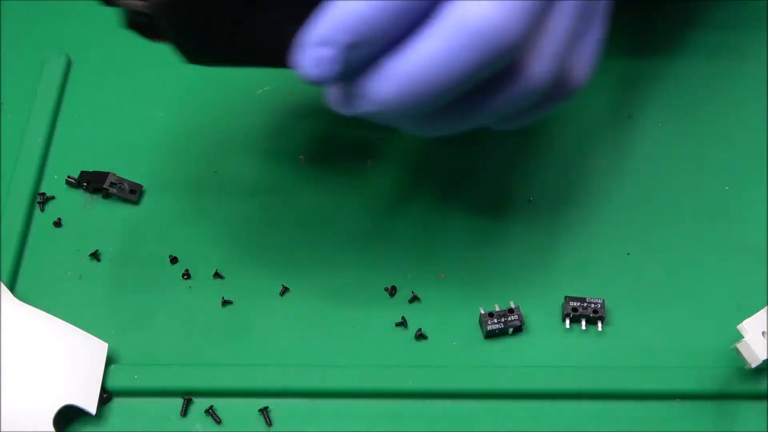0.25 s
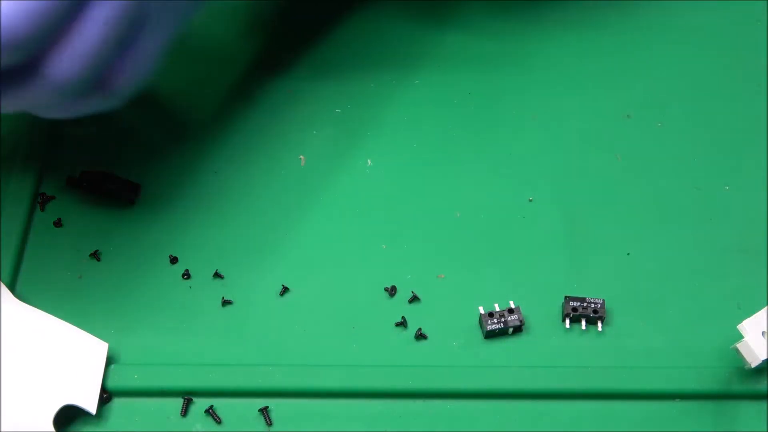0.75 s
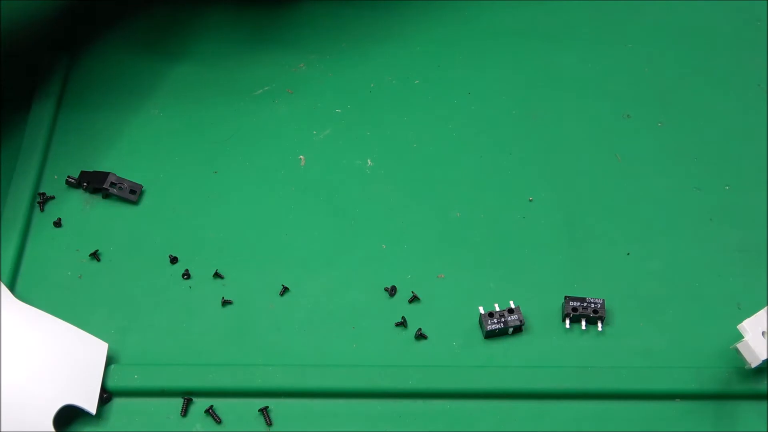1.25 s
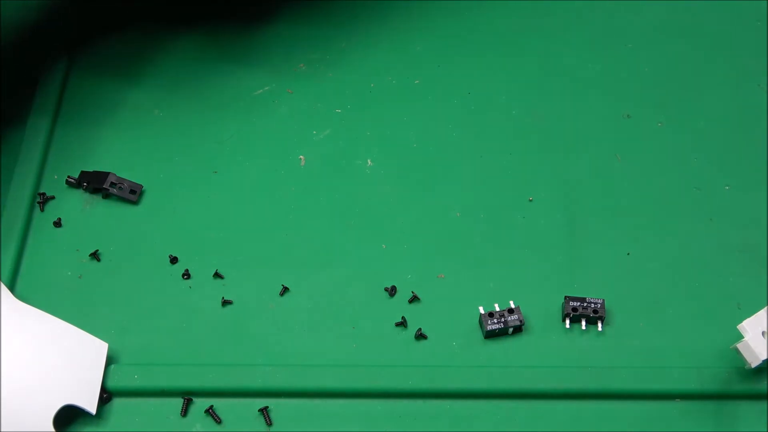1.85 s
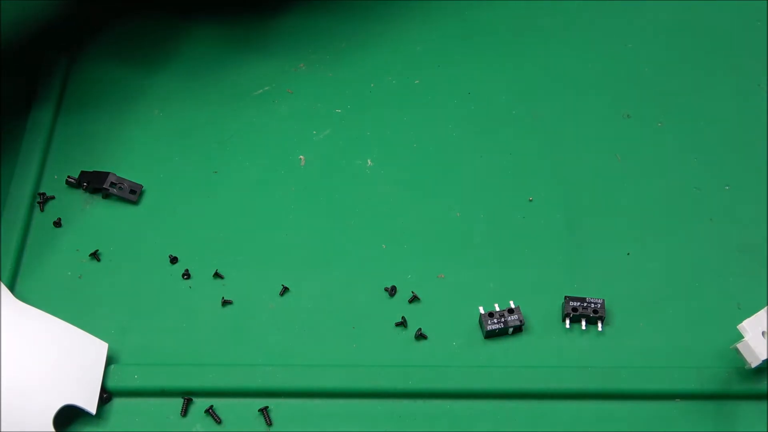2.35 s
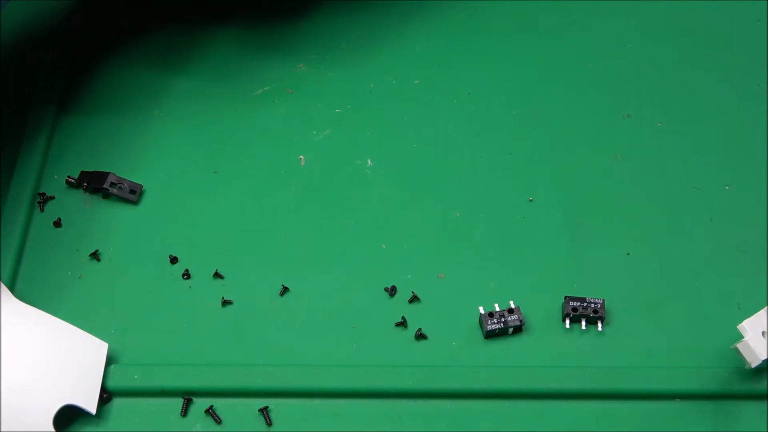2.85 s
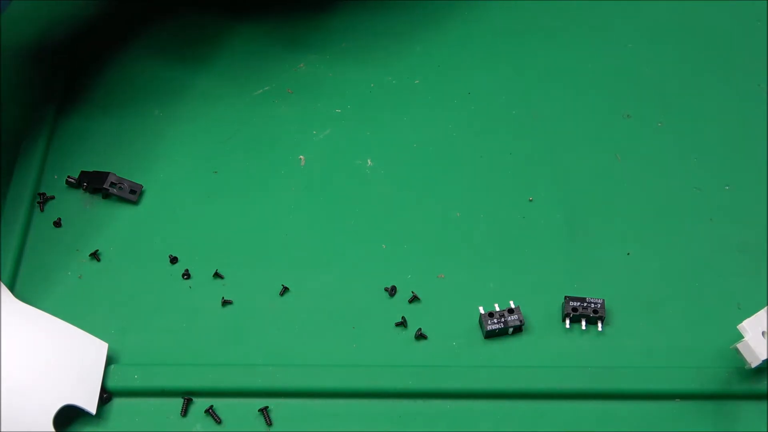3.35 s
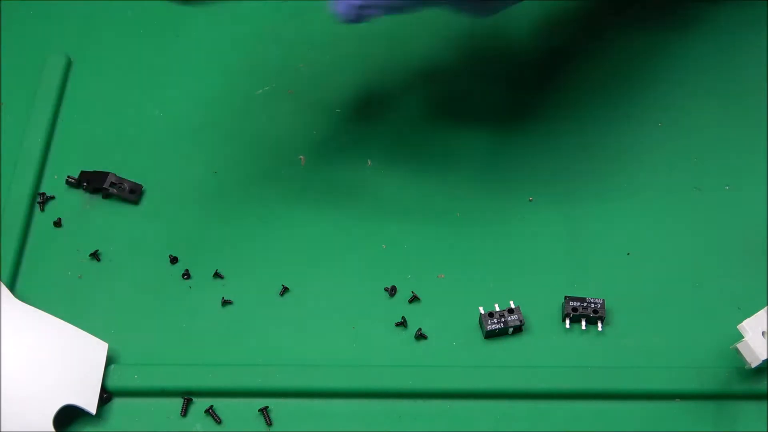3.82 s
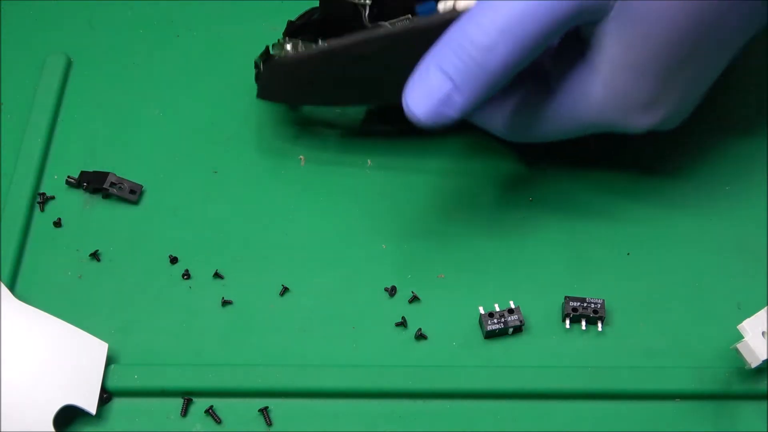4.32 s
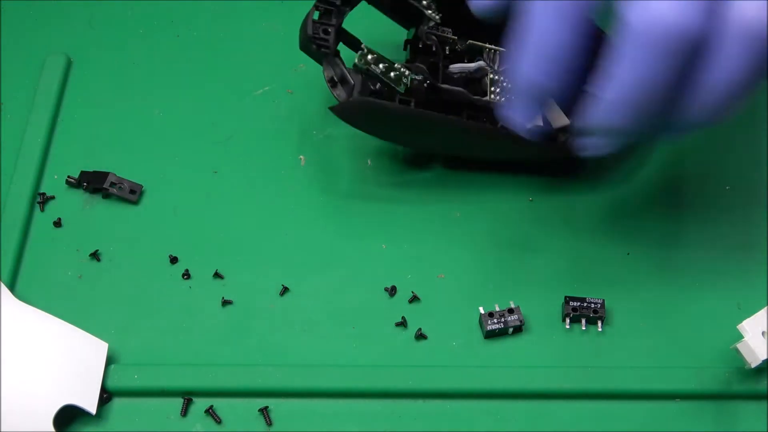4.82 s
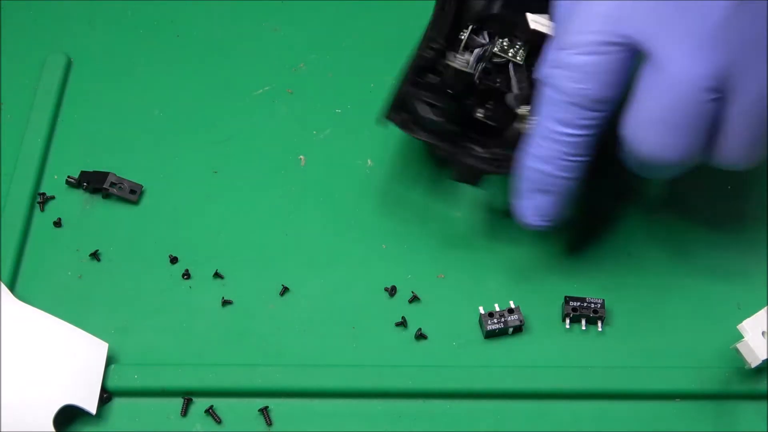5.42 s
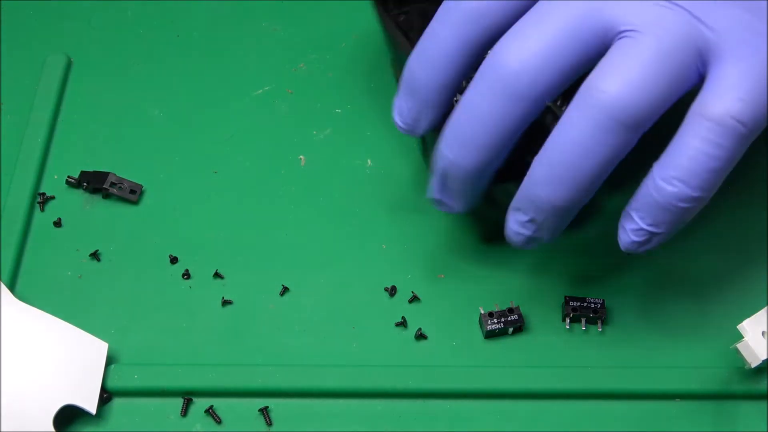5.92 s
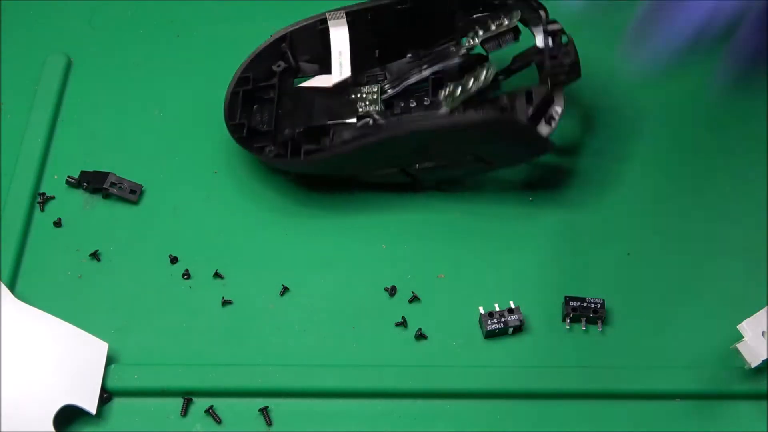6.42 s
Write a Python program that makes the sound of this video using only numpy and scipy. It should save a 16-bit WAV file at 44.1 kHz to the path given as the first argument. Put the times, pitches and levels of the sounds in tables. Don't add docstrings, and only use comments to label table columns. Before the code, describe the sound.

Plastic knocks and clicks over a rumbling fan, then a long harsh hiss of compressed air, a quiet gap, and more handling clatter.

```python
import sys
import numpy as np
from scipy import signal
from scipy.fft import rfft, irfft, next_fast_len
from scipy.io import wavfile
from scipy.ndimage import uniform_filter1d, map_coordinates

SR = 44100
rng = np.random.default_rng(int(sys.argv[2]) if len(sys.argv) > 2 else 0)


def dump_mix(stems):
    frames = np.atleast_2d(stems).T
    limited = np.clip(frames, -1, 1)
    pcm = np.round(limited * 32767).astype(np.int16)
    wavfile.write(sys.argv[1], SR, pcm)


def decibels_to_gain(level_db):
    exponent = np.asarray(level_db, float) / 20
    return 10 ** exponent


N = 294147


def unit(x):
    return x / np.sqrt(np.mean(x ** 2) + 1e-20)


def along(points, hz):
    f, v = np.transpose(points)
    return np.interp(np.log(hz + 1), np.log(f + 1), v)


def curves(rows):
    s, *cols = np.transpose(rows)
    return [np.interp(np.arange(N) / SR, s, c) for c in cols]


def wobble(rate):
    coarse = np.arange(0, N + 8, 8)
    knots = rng.standard_normal(int(N * rate / SR) + 4)
    return np.interp(np.arange(N), coarse, map_coordinates(knots, [coarse * rate / SR]))


def filtered(x, response):
    m = next_fast_len(N + 8192)
    return irfft(rfft(x, m) * response(np.fft.rfftfreq(m, 1 / SR)), m)[..., :N]


def hump(hz, centre_hz, width_hz):
    return 1 / (1 + (2 * (hz - centre_hz) / width_hz) ** 2)


def lifted(peaks, hz):
    return decibels_to_gain(sum(db * hump(hz, c, w) for c, w, db in peaks))


def rush(colour, peaks, alike, side, patchy_db, lead=((1, 0),), moving_db=0):
    z = signal.stft(rng.standard_normal((2, N)), nperseg=512)[2]
    field = uniform_filter1d(rng.standard_normal(z.shape[1:]), size=4, axis=0)
    field = uniform_filter1d(field, size=9, axis=1)
    pair = signal.istft(z * decibels_to_gain(patchy_db * unit(field) + moving_db), nperseg=512)[1]
    m = next_fast_len(N + 8192)
    hz = np.fft.rfftfreq(m, 1 / SR)
    turn = np.arccos(np.clip(along(alike, hz), 0, 1)) / 2
    coloured = rfft(pair, m) * decibels_to_gain(along(colour, hz)) * lifted(peaks, hz)
    shared, own = coloured * [np.cos(turn), np.sin(turn)]
    half = decibels_to_gain(along(side, hz) / 2) * np.exp(.5j * along(lead, hz))
    out = irfft([(shared + own) * half, (shared - own) / half], m)[:, :N]
    return out / np.std(out.mean(axis=0))


def narrow(hz, width_hz):
    slow = filtered(rng.standard_normal((2, N)), lambda f: hump(f, 0, width_hz))
    turn = 2 * np.pi * np.cumsum(hz * np.ones(N)) / SR
    return unit(slow[0] * np.cos(turn) + slow[1] * np.sin(turn))


def add(out, s, mono, pan_db):
    start = round(s * SR)
    out[:, start:start + len(mono)] += mono * decibels_to_gain([[pan_db / 2], [-pan_db / 2]])


# Hz, t60 in seconds.
WALLS = [(300, 0.43), (2000, 0.12), (8000, 0.2), (15000, 0.11)]


def walls(x):
    hz, t, z = signal.stft(rng.standard_normal((2, SR // 2)), SR, nperseg=256)
    tail = signal.istft(z * decibels_to_gain(-60 * t / along(WALLS, hz)[:, None]), SR, nperseg=256)[1]
    delayed = np.pad(x.mean(axis=0), (300, 0))[None]
    return signal.fftconvolve(delayed, tail / np.linalg.norm(tail[0]), axes=1)[:, :N]


# opens in seconds, rise in seconds, shuts in seconds, fall in seconds.
VALVE = (1.166, 0.01, 3.551, 0.0019)


def camera_gain():
    duck_db, duck_s = 13, 0.037
    quick_db, quick_s, creep_db_per_s = 6, 0.021, 3
    opens, _, shuts, _ = VALVE
    t = np.arange(N) / SR
    after = np.clip(t - shuts, 0, None)
    back_db = quick_db * (1 - np.exp(-after / quick_s)) + creep_db_per_s * after
    return -np.clip(duck_db * np.clip((t - opens) / duck_s, 0, 1) - back_db, 0, None)


# Hz, dB per Hz.
ROOM_AIR = [(15, -55), (25, -23), (120, -8), (260, -8), (520, -22), (950, -34.5), (2000, -46), (16000, -61)]
# Hz, width in Hz, dB.
DUCT = [(57, 8.2, 13), (82, 12, 6), (117.8, 11, 6), (182.6, 37, 5.5), (250, 43, 8), (350, 46, -2),
        (426, 47, 6), (7300, 6100, 4)]
# Hz, left over right in dB.
FAN_SIDE = [(60, -0.5), (110, -7), (200, 3.5), (380, 11), (800, 12.5), (3500, 6.5), (8120, -3), (15000, 0)]
# Hz, likeness 0..1.
FAN_ALIKE = [(60, 0.89), (130, 1), (290, 0.94), (640, 0.81), (1410, 0.93), (3100, .99), (6820, 0.34),
             (15000, 0.45)]
# Hz, rms level in dB.
WHINE = [
    (7101, -80.5),
]
# Hz, dB per Hz.
CAPSULE = [(500, -19.5), (2000, 8), (8000, -11), (15500, -15)]


def fan():
    fan_db = -27
    air = rush(ROOM_AIR, DUCT, FAN_ALIKE, FAN_SIDE, patchy_db=.4)
    whine_hz, whine_db = WHINE[0]
    whine_level = decibels_to_gain(whine_db + 8 - fan_db + 3.5 * wobble(2))
    whine = whine_level * np.sin(2 * np.pi * whine_hz * np.arange(N) / SR + .6 * wobble(30))
    capsule = rush(CAPSULE, [], [(1000, .6)], [(1000, 0)], patchy_db=1.5)
    return decibels_to_gain(fan_db + camera_gain()) * (air + whine) + decibels_to_gain(-67.5) * capsule


# seconds, level in dB.
RUB = [
    [(0.0, -67), (0.396, -54), (0.552, -52), (0.612, -44), (0.68, -38), (0.76, -52.5), (0.988, -55),
     (1.16, -50.5)],
    [(3.62, -48), (3.7, -58), (4.21, -65), (4.36, -58), (5.6, -61), (5.91, -49.5), (6.05, -57.5),
     (6.3, -58.5), (6.67, -48.5)],
]
# Hz, dB per Hz.
RUB_COLOUR = [(500, -43.5), (1000, -1.5), (2200, 1.5), (5000, -4.5), (9000, -11), (15500, -23)]
# start in seconds, length in seconds, level in dB.
SCUFFS = [(0, 0.094, -57.5), (0.136, .03, -51), (0.459, 0.072, -44.5), (0.636, 0.037, -43),
          (0.653, 0.056, -40.5), (0.925, .04, -59), (4.215, .022, -33), (4.226, 0.11, -44.5),
          (4.338, 0.032, -43), (4.676, 0.056, -50), (5.81, 0.038, -65), (5.937, .04, -55),
          (4.78, 0.092, -59), (6.243, .05, -62)]
# start in seconds, length in seconds,
# start Hz, end Hz, level in dB.
SQUEAKS = [(.325, 0.033, 4400, 4520, -61), (0.353, 0.045, 4600, 4700, -54.5),
           (3.556, 0.007, 1680, 1450, -16.5), (0.6, 0.029, 3600, 3630, -50), (3.91, 0.022, 6930, 7000, -61),
           (4.664, 0.019, 2250, 2250, -42), (4.679, 0.023, 2210, 2120, -45), (5.73, 0.041, 5400, 5430, -56),
           (5.814, 0.038, 1130, 1020, -40), (5.847, 0.018, 1110, 1100, -43),
           (5.865, 0.032, 1062, 1120, -45), (5.9, 0.02, 1190, 1186, -40), (5.873, .012, 1200, 1190, -44),
           (5.887, 0.03, 2210, 1804, -38), (5.902, 0.022, 1920, 2230, -45),
           (5.918, 0.059, 1150, 1070, -45.5), (5.945, 0.047, 2170, 2350, -53.5),
           (5.897, 0.037, 8700, 8900, -52), (5.956, 0.046, 8700, 8700, -45.5),
           (6.03, 0.048, 8750, 8800, -60), (6.05, .02, 7350, 7350, -57), (6.562, 0.041, 5840, 5800, -57),
           (1.123, 0.048, 1050, 1050, -49)]
# start in seconds, length in seconds, level in dB, centre in Hz.
RUSTLES = [
    (0, .04, -53, 10400),
    (3.741, .04, -58, 7300),
    (4.145, .02, -66, 8000),
    (4.967, .05, -57, 7000),
    (5.558, .03, -60, 8000),
]
# Hz, likeness 0..1.
NEAR_ALIKE = [(60, 0.63), (130, 0.61), (290, 0.26), (640, 0.88), (1410, 0.78), (3100, 1), (6820, 0.82),
              (15000, 0.61)]


def gloves():
    level_db, = curves(RUB[0] + [(1.17, -103), (3.55, -101)] + RUB[1])
    now = np.arange(N) / SR
    scuffs = sum(decibels_to_gain(db) * np.sin(np.pi * np.clip((now - s) / length, 0, 1) ** 0.57)
                 for s, length, db in SCUFFS)
    clumps = unit(decibels_to_gain(1.8 * wobble(60) + 2.5 * wobble(400)))
    grain = rush(RUB_COLOUR, [(1100, 470, 6.7)], NEAR_ALIKE, [(1000, 2), (8000, 2.5)], patchy_db=1.5)
    rub = (decibels_to_gain(level_db) + scuffs) * clumps * grain
    out = np.zeros((2, N))
    for s, length, hz, end_hz, db in SQUEAKS:
        t = np.arange(round(length * SR)) / SR
        rough = 0.11 * (2000 / hz) ** 0.25
        glide = 2 * np.pi * np.linspace(hz, end_hz, len(t)) / SR
        phase = np.cumsum(glide + rough * rng.standard_normal(len(t)))
        stutter_db = 3 * np.interp(t, np.arange(20) * .006, rng.standard_normal(20))
        swell = np.sqrt(np.sin(np.pi * t / length))
        add(out, s, decibels_to_gain(db + stutter_db) * swell * np.sin(phase), pan_db=12.0)
    for s, length, db, hz in RUSTLES:
        t = np.arange(round(length * SR)) / SR
        band = signal.butter(2, [hz / 1.3, hz * 1.3], "bandpass", fs=SR)
        dry_noise = signal.lfilter(*band, rng.standard_normal(len(t)))
        add(out, s, decibels_to_gain(db) * np.sin(np.pi * t / length) * unit(dry_noise), pan_db=5)
    return rub + out


# start in seconds, peak in dB, Hz, t60 in seconds.
BUMPS = [(0.445, -14.5, 387, 0.093), (0.656, -10, 287, 0.097), (0.78, -10.5, 277, 0.1),
         (0.875, -10.5, 265, 0.045), (1.015, -8.5, 250, 0.041), (4.369, -15.5, 197, 0.065),
         (4.696, -17, 168, 0.2), (5.737, -21, 236, 0.099), (5.832, -15, 248, 0.068),
         (5.986, -15.5, 250, 0.11), (6.157, -17, 187, 0.076), (6.627, -13, 260, 0.034)]


def bumps():
    out, t = np.zeros((2, N + SR)), np.arange(SR // 4) / SR
    for s, db, hz, t60 in BUMPS:
        ring = np.sin(2 * np.pi * hz * t) + 0.36 * np.sin(2 * np.pi * 1.7 * hz * t)
        level = decibels_to_gain(db - 2.0 - 60 * t / max(t60, .02))
        add(out, s, level * (1 - np.exp(-t / 0.0037)) * ring, pan_db=8.0)
    return out[:, :N]


# start in seconds, peak in dB, ring in Hz, left over right in dB.
TICKS = [(0.1353, -24, 8900, 4), (0.2389, -48, 7100, 1), (0.893, -35, 7700, -3), (0.9173, -32.5, 6500, 12),
         (3.7294, -43, 7390, -1.1), (3.9071, -20.5, 10700, 2), (3.9777, -31, 7500, 3.5),
         (4.3627, -15, 11300, 3), (4.413, -20, 5870, 4.5), (4.7666, -29, 6500, 3.5),
         (4.791, -34, 4810, -1.5), (5.011, -33, 5600, -3.5), (5.0385, -38, 7300, 0), (.1545, -42, 6600, 2),
         (4.87, -45, 10000, -2), (6.092, -44, 9500, -2), (5.0453, -36, 5544, .1), (5.472, -27, 7960, -4),
         (5.5548, -36.5, 7440, -4), (5.961, -21.5, 6300, 12), (6.078, -26, 5850, -5),
         (6.135, -37, 4090, -1), (6.222, -22, 5470, 5), (6.2452, -42.5, 4200, -3), (6.3394, -36, 5770, 1),
         (6.442, -21, 6000, 3), (6.641, -26, 12500, 4), (6.663, -36, 12000, 3), (6.466, -30, 6000, 9),
         (6.37, -37.5, 8000, .1), (6.54, -36, 9100, 2), (.049, -34, 7500, 2), (3.825, -44, 11000, 1),
         (3.895, -39, 8500, 1), (4.005, -50, 12000, -1), (5.226, -45, 10000, .1), (5.316, -45, 12000, .1),
         (5.342, -40.5, 6440, .1), (5.57, -41, 8000, .1), (6.527, -40, 5000, -1), (6.578, -40.5, 12500, .1),
         (6.626, -44, 12000, .1), (4.69, -34.5, 9500, 3), (4.697, -38, 6600, 3), (4.774, -39, 9000, 3)]


def ticks():
    t60_s, ring_db, tail_db, tail_t60_s = 0.01, -9, -21, .06
    out, t = np.zeros((2, N + SR)), np.arange(SR // 8) / SR
    dying = decibels_to_gain(-60 * (t / t60_s) ** 1.25) + decibels_to_gain(tail_db - 60 * t / tail_t60_s)
    attack = 1 - np.exp(-t / 0.00027)
    for s, db, hz, pan_db in TICKS:
        thin = signal.butter(2, [hz / 1.9, min(hz * 1.7, 15500)], "bandpass", fs=SR)
        crack = signal.lfilter(*thin, rng.standard_normal(len(t)))
        ring = decibels_to_gain(ring_db) * np.sin(2 * np.pi * hz * t)
        add(out, s, decibels_to_gain(db - 6.5) * dying * attack * (crack + ring), pan_db)
    return out[:, :N]


# start in seconds, peak in dB, Hz, t60 in seconds.
RINGS = [(.6225, -28, 7020, .03), (0.62, -30, 4900, .012), (.6228, -38, 9500, .012),
         (.6492, -16, 2400, 0.012), (0.649, -28, 8300, .008), (0.65, -18.5, 5700, .025),
         (0.65, -30, 8960, 0.031), (0.65, -35, 1150, 0.016), (0.65, -20, 3200, 0.011),
         (.666, -15.5, 1920, 0.018), (.688, -31, 7500, .015), (3.9072, -29, 8570, 0.0086),
         (3.9072, -24, 10500, .012), (3.9078, -24, 7100, 0.0087), (3.56, -29.5, 1480, 0.16),
         (0.81, -23, 930, 0.032), (4.26, -36, 1900, .02), (4.2036, -35, 7400, .01),
         (4.2023, -24.5, 2600, 0.013), (4.2246, -19, 1890, 0.02), (4.2317, -13.5, 1800, 0.015),
         (4.231, -23.5, 3320, .015), (4.3335, -28, 2400, .02), (4.3355, -19.5, 950, 0.021),
         (4.363, -27.5, 6750, .018), (4.3632, -30, 10300, .014), (4.3635, -36, 8400, 0.01),
         (5.8098, -34, 6000, .03), (5.8098, -32, 3400, .012), (5.867, -34, 1050, .03),
         (5.9066, -35, 2220, 0.018), (5.908, -37, 1000, 0.037), (5.936, -27, 2270, 0.027),
         (5.932, -31, 3600, .025), (4.6664, -24, 2200, 0.017), (4.6669, -34, 1150, 0.014),
         (4.6664, -37, 9450, .012), (4.683, -37, 9200, .012), (4.69, -38, 2100, .02),
         (4.6966, -36, 1300, 0.023), (5.73, -36, 940, .02), (5.987, -29, 1060, 0.029),
         (5.936, -28, 4500, .012), (5.937, -30, 7000, .01), (5.9607, -30, 7300, 0.019),
         (5.962, -44, 10600, .04), (6.639, -24, 3700, 0.029), (6.6415, -21, 7250, 0.011),
         (6.65, -23.5, 2460, 0.023), (6.65, -38, 4540, .08), (6.639, -25, 5362, .015),
         (6.64, -23, 6900, .012), (6.6423, -32, 11000, 0.014), (6.64, -35, 7800, .04)]


def rings():
    out, t = np.zeros((2, N + SR)), np.arange(SR // 10) / SR
    attack = 1 - np.exp(-t / 0.00013)
    for s, db, hz, t60 in RINGS:
        level = decibels_to_gain(db - 60 * t / max(t60, .004))
        add(out, s, level * attack * np.sin(2 * np.pi * hz * t), pan_db=6)
    return out[:, :N]


# start in seconds, peak in dB.
SNAPS = [(.6231, -18), (.6496, -22), (.6551, -16), (.6558, -11), (.6569, -19), (1.0169, -12), (3.9078, -27),
         (4.2036, -24), (4.2045, -26), (4.2264, -28), (4.2297, -24), (4.2316, -24), (4.2334, -24),
         (4.3334, -25), (4.3362, -25), (4.3642, -21), (4.6664, -31), (4.6838, -34), (5.8113, -25),
         (5.8126, -29), (5.936, -24), (5.937, -27), (5.962, -27), (6.6417, -18), (6.643, -14)]


def snaps():
    snap_hz, width_cycles = 7500, 0.71
    out, t = np.zeros((2, N)), np.arange(-32, 32) / SR
    for (s, db), chance in zip(SNAPS, rng.standard_normal(len(SNAPS))):
        turns = snap_hz * decibels_to_gain(0.62 * chance) * t
        pulse = np.exp(-.5 * (turns / width_cycles) ** 2) * np.sin(2 * np.pi * turns)
        add(out, s + t[0], decibels_to_gain(db) * pulse, pan_db=5.5)
    return out


# start in seconds, crack peak in dB, body over crack in dB,
# sizzle over crack in dB, main ring in Hz.
KNOCKS = [(0.4786, -47, 15, -13, 2250), (0.623, -19, -10.5, -19, 1900), (0.63, -25.5, 4, 2, 1310),
          (0.6542, -17, 4.5, -7.5, 1200), (0.687, -35.5, 13, 0, 1260), (1.0163, -16, -10, -10.5, 2070),
          (3.5575, -13, -16, -29, 1480), (4.2024, -26, 3, -8.5, 1220), (4.2248, -20.5, 1, -24, 1910),
          (4.23, -18.5, -6, -28, 1960), (4.332, -21, -3, -13, 1980), (4.3358, -26, -1.5, -15, 905),
          (4.6661, -38, 5, -3, 2180), (4.683, -36, 5.5, -4, 2193), (4.6882, -40, 6, -2, 1230),
          (5.6247, -32.5, -11.5, -13, 1050), (5.811, -27.5, -7, -7, 1050), (5.9344, -21, -8, -13, 1150),
          (5.988, -31.5, -2, -4, 1024), (6.486, -30, -14, -13.5, 2060), (6.641, -15, -32, -31, 2660),
          (6.6614, -27, -4.5, -4, 920)]
# start in seconds, body peak in dB, main ring in Hz.
TAPS = [(0.359, -45, 995), (0.399, -34.5, 2430), (0.59, -32.5, 2100), (0.649, -21, 2180),
        (0.7161, -22.5, 960), (0.784, -26.5, 710), (0.93, -32, 1250), (4.247, -46, 1800),
        (4.273, -31, 2170), (4.312, -25, 1220), (4.481, -36.5, 805), (4.699, -33.5, 735),
        (5.7306, -32, 1050), (5.866, -39, 1084), (6.059, -36.5, 1008)]
# Hz, width in Hz, dB.
SHELL = [(438, 400, 15.5), (1050, 180, 12), (1110, 67, -2), (1920, 260, 4.5), (2250, 1000, 3)]


def knocks():
    tap_crack_db, tap_sizzle_db = -14.5, -13
    out, t = np.zeros((2, N + SR)), np.arange(16384) / SR
    f = np.fft.rfftfreq(len(t), 1 / SR)

    def band(lo, hi):
        return 1 / (1 + (lo / (f + 1)) ** 4) / (1 + (f / hi) ** 4)

    def burst(shape):
        return unit(irfft(rfft(rng.standard_normal(len(t))) * shape))

    def dying(snap_s, scrape_s):
        return decibels_to_gain(-60 * t / snap_s) + decibels_to_gain(-11 - 60 * t / scrape_s)

    start = 1 - np.exp(-t / .0003)
    soft = [(s, db + tap_crack_db, -tap_crack_db, tap_sizzle_db, hz) for s, db, hz in TAPS]
    for s, db, body_db, sizzle_db, hz in KNOCKS + soft:
        t60 = max(0.13 * decibels_to_gain(0.39 * (db + body_db + 35.5)), .01)
        body = burst(band(375, 2840) * lifted(SHELL + [(hz, 300, 6)], f)) * dying(0.062, 1.27 * t60)
        crack = burst(band(2000, 5100)) * dying(0.0071, 0.88 * t60)
        sizzle = burst(band(5900, 8600)) * dying(0.018, 0.97 * t60)
        grit = decibels_to_gain(2.5 * np.repeat(rng.standard_normal(len(t) // 90 + 1), 90)[:len(t)])
        ring = 1.5 * decibels_to_gain(-60 * t / 0.024) * np.sin(2 * np.pi * hz * t)
        add(out, s, decibels_to_gain(db + body_db - 8.5) * (body + ring) * (1 - np.exp(-t / 0.0004)), pan_db=10)
        add(out, s, decibels_to_gain(db - 6.0) * crack * grit * start, pan_db=4.0)
        add(out, s, decibels_to_gain(db + sizzle_db - 3.0) * sizzle * grit * start, pan_db=9.0)
    return out[:, :N]


# Hz, width in Hz, dB.
NOZZLE = [(1150, 22, -23), (2180, 52, -6.5), (1680, 420, 6), (2583, 190, 7), (1947, 30, 7),
          (3230, 83, -3.5), (4600, 180, -0.5), (4940, 200, -3), (5440, 860, 11), (6470, 620, 8.5),
          (8010, 390, 8.5), (9100, 380, 5), (11420, 1940, 9.5), (13400, 700, 1.5)]
# seconds, loss in dB.
SWINGS = [
    (1.45, 4.2),
    (1.8, 4.5),
    (2.1, 5.7),
    (2.26, 1.8),
    (2.6, 5),
    (2.76, 3.9),
    (2.93, 6.5),
    (3.27, 3.4),
    (3.4, 2.6),
]


def swinging():
    swing_s, shade_hz, shade_width_hz = 0.026, 4080, 1670
    drift = .009
    hz = np.fft.rfftfreq(512, 1 / SR)[:, None]
    t = np.arange(-(-N // 256) + 1) * 256 / SR
    moved = 0
    for c, w, db in NOZZLE:
        if w > 150:
            slow = np.interp(t, np.arange(N) / SR, wobble(6))
            moved = moved + db * (hump(hz, c * (1 + drift * slow), w) - hump(hz, c, w))
    shade_db = sum(db * np.exp(-((t - s) / swing_s) ** 2) for s, db in SWINGS)
    return moved - shade_db * np.exp(-((hz - shade_hz) / shade_width_hz) ** 2)


# seconds, Hz, strength in dB.
WHISTLE = [
    (1.18, 8720, -21),
    (1.67, 8270, -31),
    (1.71, 8420, -23.5),
    (2.36, 8480, -27.5),
    (3.06, 8380, -22.5),
    (3.39, 8420, -33),
    (3.44, 8210, -24),
    (3.54, 9200, -21.5),
    (3.55, 9000, -30),
]
# seconds, level in dB.
VALVE_SONG = [
    (1.165, -23),
    (1.181, -30),
    (1.195, -29),
    (1.22, -67),
    (3.51, -51),
    (3.535, -25),
    (3.56, -29),
]
# Hz, width in Hz.
VALVE_TONE = (3850, 220)
# start in seconds, length in seconds,
# start Hz, end Hz, level in dB.
FLARES = [
    (1.48, 0.093, 8350, 7900, -27),
    (1.97, .08, 8470, 8000, -33),
    (2.579, 0.14, 9190, 7990, -25.5),
    (2.9, .16, 8600, 7920, -27.5),
    (3.069, .11, 8980, 8250, -27),
    (3.419, 0.067, 8130, 8120, -28.5),
]
# seconds, level in dB.
EDGE = [
    (1.17, -45),
    (1.3, -27.5),
    (1.5, -27),
    (1.75, -35),
    (2.1, -36),
    (2.6, -56),
    (3.0, -52),
    (3.3, -33.5),
    (3.55, -45),
]


def whistles():
    t = np.arange(N) / SR
    whistle_hz, strength_db = curves(WHISTLE)
    whistle_db = -29 + 1.8 * (strength_db + 24.5) + 1.3 * wobble(15)
    tones = decibels_to_gain(whistle_db) * narrow(whistle_hz + 70 * wobble(16), width_hz=820)
    tones = tones + decibels_to_gain(curves(VALVE_SONG)[0]) * narrow(*VALVE_TONE)
    glides, flares = [], 0
    for s, length, hz, end_hz, db in FLARES:
        glides += [(s, hz), (s + length, end_hz)]
        flares = flares + decibels_to_gain(db) * np.abs(np.sin(np.pi * np.clip((t - s) / length, 0, 1))) ** 0.64
    tones = tones + flares * narrow(curves(glides)[0], width_hz=350)
    edge_hz = 5870
    octave = decibels_to_gain(-8) * narrow(2 * edge_hz, width_hz=440)
    return tones + decibels_to_gain(curves(EDGE)[0]) * (narrow(edge_hz, width_hz=340) + octave)


# Hz, dB per Hz.
HISS = [(3500, -51), (5000, -9), (7300, -3), (9500, -1.5), (10300, -17), (12000, -51)]
TOP = [(8500, -42), (10200, -6), (12800, -5), (14200, -3), (15000, -12.5), (16000, -8)]
CAVITY = [(800, -63), (1200, -11.5), (2200, -8), (3200, -5.5), (4800, -9.5), (6000, -49)]
ROAR = [(100, -17), (300, -3.5), (600, 1), (1000, 1), (1300, -4.5), (1800, -58.5)]
# Hz, left over right in dB.
JET_SIDE = [(110, -23), (380, 15.5), (700, 10), (1290, 16), (2380, 10.5), (4400, 7.5), (8120, 9),
            (15000, 13.5)]
# Hz, phase lead in radians.
JET_LEAD = [(4000, -0.24), (8000, 0.061), (15000, -0.4)]
# seconds, flow in dB, aim into the hollow -1.3..1.
AIM = [
    (1.17, -1, 0.97),
    (1.62, -1.3, -0.51),
    (1.95, -0.1, 0.038),
    (2.18, -1.1, -1.3),
    (2.61, -0.3, -0.45),
    (2.64, 0, 0.93),
    (3.1, 0, 0.69),
    (3.3, 0, -0.016),
    (3.55, -0.9, -0.057),
]
# seconds, added roar in dB.
GUSTS = [
    (1.245, 8.4),
    (1.97, 1.3),
    (2.36, 8.2),
    (2.52, 2.5),
    (2.65, 3.3),
    (2.71, 6.2),
    (2.81, 8.7),
    (2.96, 4.9),
    (3.12, 6),
]


def air_gun():
    gust_width_s = 0.025
    t = np.arange(N) / SR
    opens, rise, shuts, fall = VALVE
    flow = np.clip((t - opens) / rise, 0, 1) * np.exp(-np.clip(t - shuts, 0, None) / fall)
    flutter_db = .5 * wobble(40) + .4 * wobble(300)
    lumps_db = wobble(25)
    flow_db, aim = curves(AIM)

    def sway():
        return flow_db + 0.7 * wobble(7.5)

    hiss_db = -19.5 + sway()
    top_db = -25.5 - 1.4 * aim + sway()
    cavity_db = -24 + 0.27 * aim + sway()
    late_db = 14 * np.clip((opens + 0.046 - t) / 0.02, 0, 1)
    gusts_db = sum(db * np.exp(-((t - s) / gust_width_s) ** 2) for s, db in GUSTS)
    roar_db = -39 + 2.5 * aim - late_db + gusts_db
    moving_db = swinging()

    def layer(colour, patchy_db):
        return rush(colour, NOZZLE, NEAR_ALIKE, JET_SIDE, patchy_db, JET_LEAD, moving_db)

    jet = decibels_to_gain(hiss_db - 1.7 + flutter_db) * layer(HISS, patchy_db=2.4)
    jet = jet + decibels_to_gain(top_db + flutter_db) * layer(TOP, patchy_db=2.4)
    jet = jet + decibels_to_gain(cavity_db + flutter_db + .7 * lumps_db) * layer(CAVITY, patchy_db=1.6)
    jet = jet + decibels_to_gain(roar_db + 1.1 * lumps_db) * layer(ROAR, patchy_db=1.2)
    return flow * (jet + whistles() * decibels_to_gain([[2.5], [-3.5]]))


def scene():
    background = fan() + gloves() + bumps()
    clicks = ticks() + rings()
    blows = knocks() + snaps()
    jet = air_gun()
    echo = walls(decibels_to_gain(-14.0) * jet + decibels_to_gain(-13.5) * blows + decibels_to_gain(-18) * clicks)
    return background + clicks + blows + jet + echo


def band_limit(x):
    return signal.sosfilt(signal.butter(12, 16500, fs=SR, output="sos"), x)


def record(dry):
    limited = filtered(dry, lambda hz: hz < 15750)
    return band_limit(limited)


dry = scene()
out = record(dry)
dump_mix(out)
```